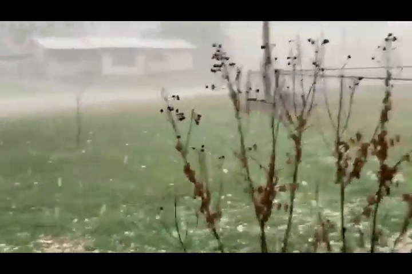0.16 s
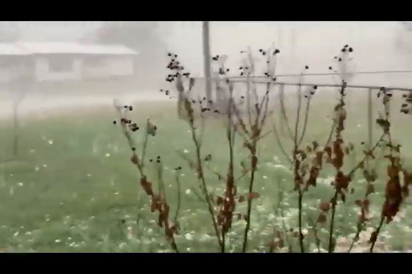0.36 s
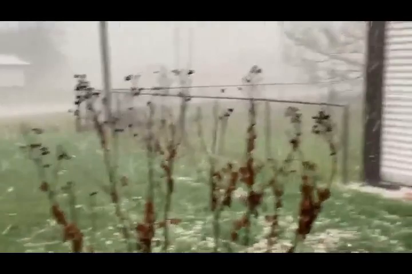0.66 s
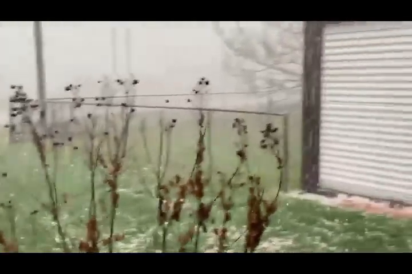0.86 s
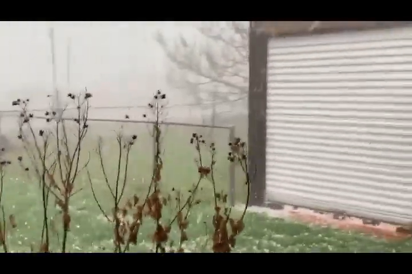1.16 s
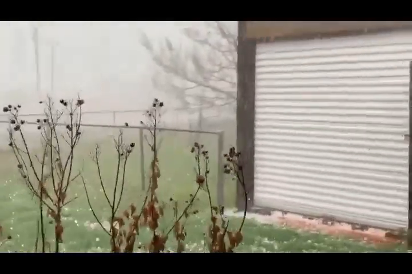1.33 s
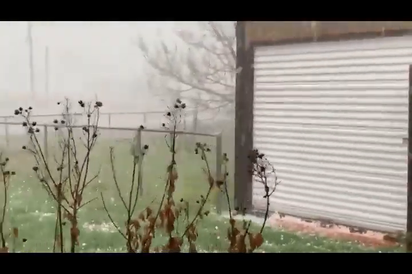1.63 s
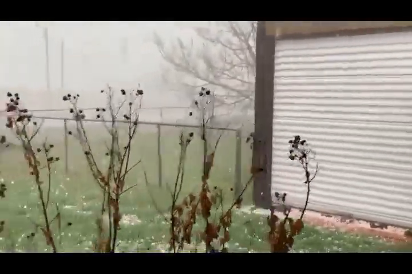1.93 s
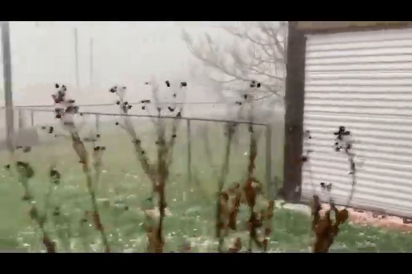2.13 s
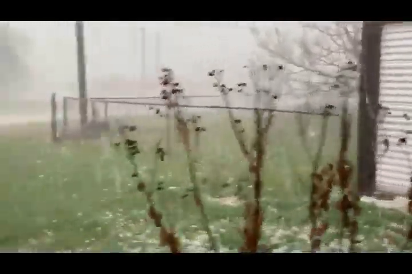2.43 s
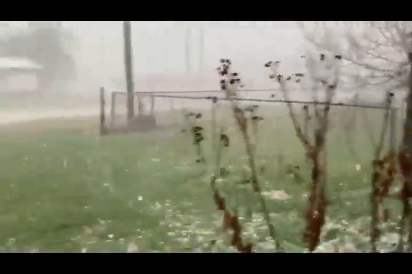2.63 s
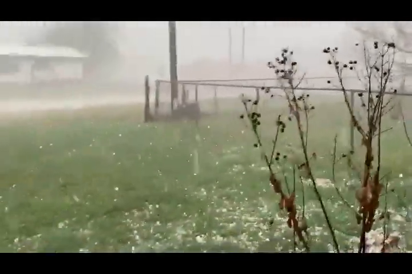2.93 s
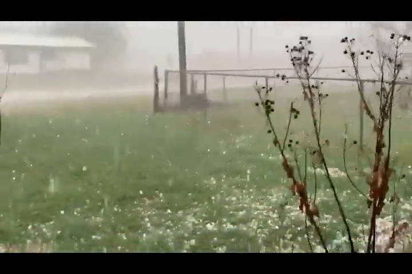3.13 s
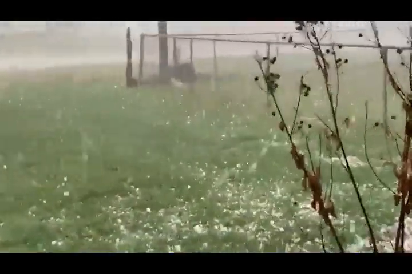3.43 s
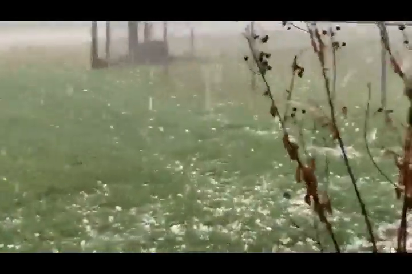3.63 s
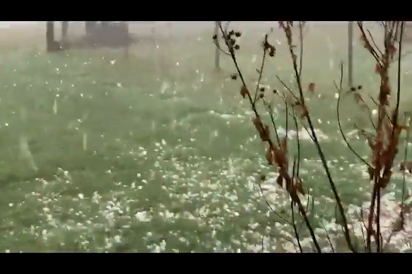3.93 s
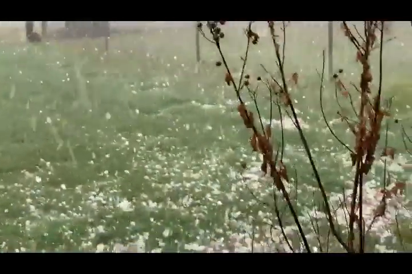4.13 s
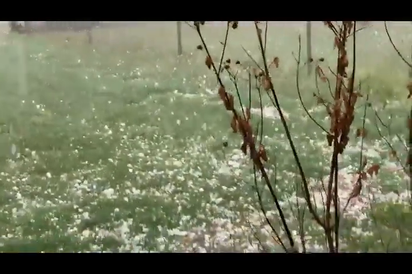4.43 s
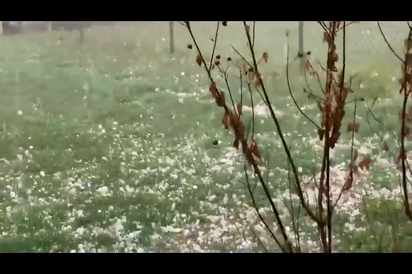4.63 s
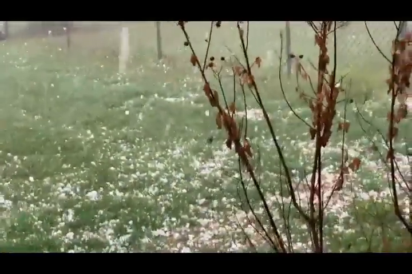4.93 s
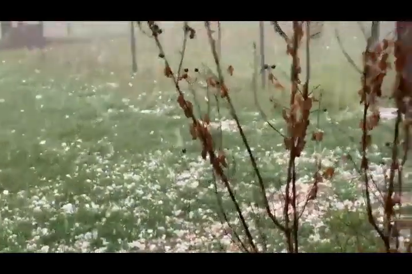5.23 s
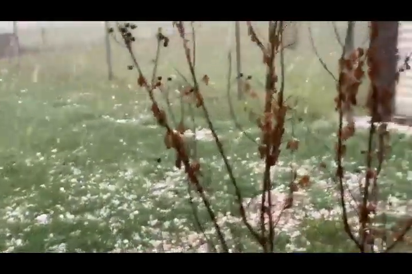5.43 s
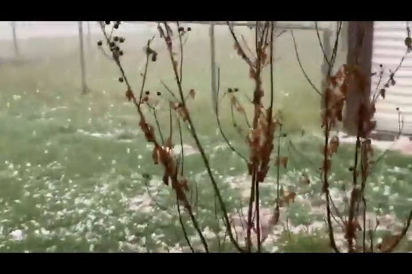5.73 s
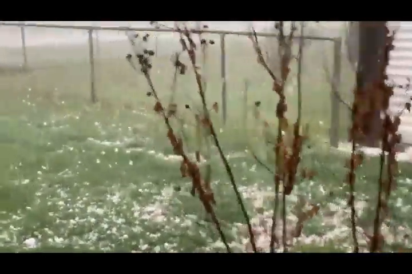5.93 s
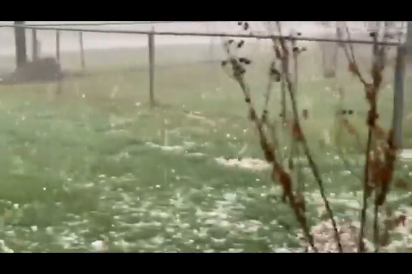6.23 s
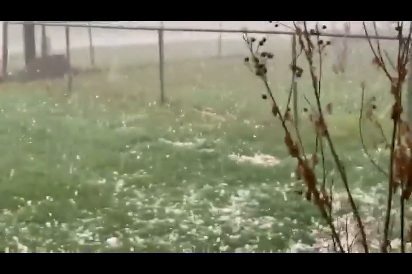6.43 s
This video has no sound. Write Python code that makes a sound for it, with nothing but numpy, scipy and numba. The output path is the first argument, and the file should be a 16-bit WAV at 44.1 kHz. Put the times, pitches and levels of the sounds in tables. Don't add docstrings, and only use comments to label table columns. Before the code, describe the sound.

For about six and a half seconds, heavy hail and rain beat on a lawn, porch roof and thin metal shed door. The sound is already full at the start: a dense, wide hiss of countless tiny ringing knocks over a smooth rain wash, with a faintly hollow porch colour. Gusts make it flicker rapidly. A loud low knock lands near 0.8 s and a dry pipe tick near 1.35 s; light metal raps and wooden thuds are scattered throughout. From about 2.3 to 2.7 s the fall eases by a couple of decibels, then stays steady. A high tick comes at 2.8 s, strong knocks to the left around 3.1 and 3.3 s, and the loudest sharp tick near 3.7 s. Another low knock sits right of centre near 5.95 s. The storm continues to the abrupt end, heard through a handheld stereo phone with limited, slightly watery treble.

```python
import sys
import numpy as np
from scipy import signal
from scipy.fft import rfft, irfft, dct
from scipy.io import wavfile
from scipy.ndimage import uniform_filter1d
from numba import njit

SR = 44100
rng = np.random.default_rng(int(sys.argv[2]) if len(sys.argv) > 2 else 0)


def voltage_ratio(level):
    return 10 ** (np.asarray(level, float) / 20)


def wrap_up_sound(samples):
    columns = np.atleast_2d(samples).T
    tamed = np.clip(columns, -1, 1)
    steps = np.round(tamed * 32767).astype(np.int16)
    wavfile.write(sys.argv[1], SR, steps)


N = 289296


# left_lag_ms [ms], lag_spread_ms [ms], level_db [dB], extra_above_knee_db [dB]
PATCHES = [
    (0.2132, 0.0098, -1.5, 8.5),
    (.27, 0.098, -1.5, -2.5),
    (-.38, 0.11, -1.5, -3),
    (.03, .3, -2, -2.5),
]
KNOCKS_PER_S = 30000
KNEE_HZ = 6760


def hail(gust, cycles, scatter_db, flicker_db):
    count = int(KNOCKS_PER_S * N / SR)
    when, pitch, big, ring = rng.random((count, 4)).T
    start = when * (N - 1)
    moment = start.astype(int)
    hz = 40 + 12500 * pitch ** 1.4

    lag_ms, spread_ms, patch_db, extra_db = np.array(PATCHES).T
    patch = np.arange(count) % len(PATCHES)
    octaves_above_knee = np.log2(hz[:, None] / KNEE_HZ)
    shares = voltage_ratio(patch_db + extra_db * np.tanh(4 * octaves_above_knee))
    share = shares[np.arange(count), patch] / np.sqrt(np.sum(shares ** 2, axis=1))

    strength_db, pan_db = gust_db(gust[:, moment], hz)
    flurries = np.array([walk(14) for _ in range(7)])
    flurry = flurries[np.minimum(pitch * 7, 6).astype(int), moment]
    stone_db = -scatter_db * np.log(1 - .99 * big)
    size = share * hz ** 0.68 * voltage_ratio(strength_db + flicker_db * pitch * flurry + stone_db)
    lag = (lag_ms[patch] + spread_ms[patch] * rng.standard_normal(count)) * SR / 1000
    left, right = size * voltage_ratio(pan_db / 2), size * voltage_ratio(-pan_db / 2)
    return knocks(start, hz, cycles * (.5 + ring), left, right, np.clip(lag, -60, 60), N)


@njit
def knocks(start, hz, cycles, left, right, lag, count):
    out = np.zeros((2, count + 4096))
    for k in range(len(start)):
        s = (2j * np.pi - 3 / cycles[k]) * hz[k] / SR
        turn = np.exp(s)
        length = min(int(2 * cycles[k] * SR / hz[k]) + 1, 3900)
        for port in range(2):
            t = start[k] + (lag[k] if port == 0 else -lag[k]) / 2 + 64
            i = int(t) + 1
            z = np.exp(s * (i - t)) * (left[k] if port == 0 else right[k])
            for j in range(length):
                out[port, i + j] += z.imag * min(1., (i + j - t) * hz[k] / SR)
                z *= turn
    return out[:, 64:count + 64]


# time_s [s], level_db [dB]
FALL = [(0, -27), (1.05, -26.5), (2.35, -28), (2.65, -29), (3.9, -28.5), (5.2, -29.5), (5.9, -28.5),
        (6.3, -29.5), (6.37, -28), (6.43, -29), (6.56, -29)]
# time_s [s], swell_db [dB], extra_for_high_stones_db [dB]
FLURRIES = [(0.069, 1.7, -1.5), (0.211, -1, 0.5), (0.378, -0.5, -1.2), (0.464, -0.7, -3), (0.559, 0.5, 2),
            (0.633, 0, 2.5), (0.685, -0.6, -0.5), (0.777, -2, 2.5), (0.848, -1, -0.5), (0.945, 0.6, 0.5),
            (1.156, 0, 3), (1.228, -0.5, -1.5), (1.349, 2.3, -4.5), (1.416, -2, -0.5), (1.725, -2, 0),
            (1.93, 1, -0.5), (2.162, 2, 1.5), (2.245, 1.5, 0), (2.418, 1.5, 1.5), (2.536, 0, 0),
            (2.667, 0, -7), (2.812, 2, 2.5), (2.941, -2.5, 3), (2.978, 1.5, -5), (3.019, -2.3, 1),
            (3.265, 2.5, -2.5), (3.33, -2, 1), (3.401, -0.5, -4), (3.452, 1, 2.5), (3.557, 1.8, 0.0),
            (3.676, 2, -0.5), (3.743, 1, -6.5), (3.881, -0.5, 0.5), (3.949, 0.6, 4), (4.14, -0.5, 2),
            (4.242, -1, 4), (4.312, 0, -3), (4.452, 2.1, -5.5), (4.486, 2, -3), (4.631, -2.4, 2.5),
            (4.797, 2, 0), (4.936, -1, -1), (4.992, 0.1, 1.5), (5.296, -2.5, 1), (5.408, 1.2, 4.5),
            (5.515, 1.9, -7), (5.58, 1.1, -2.7), (5.627, -0.5, -3.5), (5.682, 0.5, 4), (5.748, -1.5, -2),
            (5.789, 0.7, 4.5), (5.84, -2.5, 1.5), (5.901, 1, 3), (6.021, 0.5, 6), (6.132, 1, 0.5),
            (6.357, -5.5, 7), (6.472, 0, -2), (6.549, 3, 2)]
FLURRY_S = 0.018


def gusts():
    t = np.arange(N) / SR
    fall_s, fall_db = np.transpose(FALL)
    slow = np.interp(t, fall_s, fall_db) - np.interp(t, fall_s, fall_db).mean()
    swell, bright = np.zeros((2, N))
    for time_s, swell_db, extra_db in FLURRIES:
        bump = np.exp(-.5 * ((t - time_s) / FLURRY_S) ** 2)
        swell += swell_db * bump
        bright += extra_db * bump
    treble = 1.4 * slow + swell + 0.65 * bright + 0.5 * walk(24)
    bass = slow + 0.44 * swell + 0.5 * walk(12)
    lean = 0.03 * walk(4)
    return np.array([slow + swell, treble, bass, lean])


def gust_db(gust, hz):
    middle, treble, bass, lean = gust
    high = np.clip(np.log2(hz / 4000) + .5, 0, 1)
    low = np.clip(np.log2(400 / hz) + .5, 0, 1)
    return (1 - low - high) * middle + high * treble + low * bass, lean


def walk(rate):
    k = int(SR / rate)
    held = np.repeat(rng.standard_normal(N // k + 1), k)
    return 2.05 * uniform_filter1d(uniform_filter1d(held, k), k)[:N]


def level(x, db):
    return x * voltage_ratio(db) / np.sqrt(np.mean(x ** 2))


def shatter(events, cycles, burst_s, gain_db):
    start_s, peak_db, pitch_hz, pan_db = np.repeat(np.array(events), 9, axis=0).T
    late, detune = rng.random((len(start_s), 2)).T
    size = voltage_ratio(peak_db + gain_db - 2.9 * late)
    start = (start_s + burst_s * late ** 1.4) * SR
    hz = pitch_hz * 2 ** (0.7 * detune - .35)
    flat = np.ones(len(start))
    left, right = size * voltage_ratio(pan_db / 2), size * voltage_ratio(-pan_db / 2)
    return knocks(start, hz, cycles * flat, left, right, 9.5 * flat, N)


# start_s [s], level_db [dB], pitch_hz [Hz], left_minus_right_db [dB]
STONES = [
    (0.841, -15, 1120, -1),
    (1.298, -25, 2570, 2),
    (3.066, -15.5, 1650, 9),
    (3.277, -14, 1205, 10.5),
    (3.761, -17, 1960, -2),
    (3.809, -45, 2020, -27),
    (5.219, -27, 2500, 9),
    (5.576, -49, 2090, -9),
    (5.757, -21, 1080, 4),
    (5.949, -15, 1060, -5),
]


def near_stones():
    return shatter(STONES, 4.7, 0.011, -2.5)


# start_s [s], level_db [dB], pitch_hz [Hz], left_minus_right_db [dB]
SPLASHES = [(1.4775, -40, 4290, -10), (3.1158, -20, 4480, -4), (3.248, -15, 4920, -4),
            (3.673, -10, 9400, 2), (3.9175, -31, 4460, -16), (4.8688, -35, 4170, 6), (4.988, -26, 4010, -2),
            (5.1267, -18.5, 4100, 4), (5.3847, -17, 5100, -4), (6.1235, -17.5, 4210, -5),
            (6.3784, -22, 4070, 3)]


def splashes():
    return shatter(SPLASHES, 14.0, 0.0073, -6.5)


# start_s [s], level_db [dB], pitch_hz [Hz], left_minus_right_db [dB]
THUDS = [(0.209, -21, 690, 9), (1.297, -19, 660, -1.5), (1.515, -19, 993, -4), (1.741, -26, 662, 9),
         (2.055, -25, 872, 10), (3.242, -27, 700, 7), (4.441, -22, 686, 2), (4.793, -23, 872, -1),
         (5.127, -33, 710, 1), (5.466, -20, 810, 1), (5.841, -27, 740, -4)]


def porch_thuds():
    return shatter(THUDS, 4.5, 0.011, -3.5)


# start_s [s], level_db [dB], pitch_hz [Hz], left_minus_right_db [dB]
TICKS = [
    (0.8579, -20, 2200, -0.5),
    (1.3494, -11, 2050, -1.0),
    (2.0104, -24, 2960, 0.0),
    (2.3391, -25, 2300, -0.5),
    (2.5564, -34, 2650, 0.5),
    (2.8094, -13, 3140, -0.5),
    (3.6825, -6.5, 2100, 0.0),
    (3.8324, -15, 3800, -0.5),
    (5.4094, -25, 2510, -0.5),
    (5.4994, -28, 3030, -0.5),
]


def pipe_ticks():
    return shatter(TICKS, 2.4, 0.013, -10)


# start_s [s], level_db [dB], pitch_hz [Hz], left_minus_right_db [dB]
PELLETS = [(0.3094, -18, 2550, 0.5), (0.6094, -16, 2070, 0.0), (1.0624, -17, 2160, -1.0),
           (1.1444, -18, 2110, -1.0), (1.4904, -13, 1500, 0.0), (1.5164, -21, 2000, -1.0),
           (1.7424, -19, 1940, -1.5), (2.0574, -16, 2730, -1.0), (2.1464, -13, 2990, -1.5),
           (2.2243, -16, 2360, -1.5), (2.4074, -18, 2610, -0.5), (2.7048, -21, 2710, -0.5),
           (3.0964, -21, 2250, -1.0), (3.25, -17, 2070, 0.5), (3.2844, -20, 2200, 0.0),
           (3.9174, -23, 2370, -2.0), (5.3854, -19, 2490, -0.5)]


def door_pellets():
    return shatter(PELLETS, 3.0, 0.008, -12.5)


def far_rain(gust):
    mid, side = rfft(rng.standard_normal((2, N)))
    like = 1 / (1 + (np.fft.rfftfreq(N, 1 / SR) / 150) ** 2)
    mid = irfft(mid * np.sqrt(1 + like), N)
    side = irfft(side * np.sqrt(1 - like), N)
    return np.array([mid + side, mid - side]) * voltage_ratio(gust[0])


# pitch_hz [Hz], level_db [dB], left_minus_right_db [dB]
COLOUR = [(29.3, -17.5, 1), (61.3, -4, 0.5), (164, -4, -3.5), (258, -1.17, -3), (510, -2, 0),
          (1080, 0.02, -0.5), (1800, 0.1, -0.5), (2050, 0.5, -1), (2990, -3.5, 0.1), (4380, -5.5, -1),
          (5480, -11, -3), (7940, -11, 1), (7910, -10, 0.5), (12900, -19, -1)]
# pitch_hz [Hz], width_hz [Hz], boost_db [dB]
PORCH = [
    (260, 33, 2.5),
    (416, 54, 2.5),
    (666, 54, 3),
    (860, 100, 1),
    (2100, 540, 0.5),
]
# pitch_hz [Hz], sum_of_ports_db [dB], difference_of_ports_db [dB]
SUM_DIFFERENCE_TINT = [(288, 0, 0), (579, 0, 2.5), (1103, 0, -1.5), (1736, -1, 1), (2300, -1, -0.5), (2990, -0.5, 2),
                       (4350, -0.5, 1), (5220, -0.5, 0.5), (5770, -1, 3.5), (6520, 1, -2.5), (7600, -2.5, 0.5),
                       (8380, 1, -1), (9400, 0.5, 2), (10600, 0.5, 1.5)]


def colour(x):
    hz = np.fft.rfftfreq(N, 1 / SR) + 1
    f = np.log(hz)
    point_hz, db, lean_db = np.transpose(COLOUR)
    gain_db = [np.interp(f, np.log(point_hz), db + side * lean_db / 2, left=-40) for side in (1, -1)]
    porch_db = sum(boost_db / (1 + (2 * (hz - note_hz) / width_hz) ** 2) for note_hz, width_hz, boost_db in PORCH)
    left, right = rfft(x) * voltage_ratio(np.array(gain_db) + porch_db)
    point_hz, mid_db, side_db = np.transpose(SUM_DIFFERENCE_TINT)
    mid = (left + right) / 2 * voltage_ratio(np.interp(f, np.log(point_hz), mid_db))
    side = (left - right) / 2 * voltage_ratio(np.interp(f, np.log(point_hz), side_db) - 0.64)
    return irfft(np.array([mid + side, mid - side]), N)


def scene():
    gust = gusts()
    fall = colour(level(hail(gust, 4.67, 1.4, 1.6), 0) + level(far_rain(gust), -3.0))
    stones = near_stones() + splashes() + porch_thuds() + pipe_ticks() + door_pellets()
    return level(fall, -24) + stones


# pitch_hz [Hz], band_level_over_step [ratio]
FINENESS = [(200, 18), (800, 7.5), (1500, 3.2), (3000, 2.4), (5200, 1.8), (7600, 1.7), (9000, 1.7),
            (10300, 1.4), (11500, 1.2)]
# start_s [s], end_s [s]
EMPTY = [(0.18, 0.2), (0.27, 0.31), (0.36, 0.45), (0.55, 0.59), (0.69, 0.71), (0.73, 0.8), (0.92, 1.05),
         (1.1, 1.12), (1.24, 1.26), (1.31, 1.4), (1.43, 1.52), (1.57, 1.7), (1.78, 1.8), (2.13, 2.15),
         (2.43, 2.47), (2.64, 2.7), (2.82, 2.84), (2.94, 3.0), (3.19, 3.24), (3.36, 3.47), (3.54, 3.56),
         (3.61, 3.68), (3.7, 3.84), (3.87, 3.89), (4.01, 4.33), (4.4, 4.44), (4.8, 4.89), (5.05, 5.07),
         (5.12, 5.19), (5.21, 5.26), (5.42, 5.47), (5.49, 5.51), (5.56, 5.7), (5.72, 5.93), (6.0, 6.14),
         (6.24, 6.28), (6.42, 6.44)]
# start_s [s], end_s [s]
WIDE = [(4.04, 4.17), (5.79, 5.89)]
# start_s [s], end_s [s]
ALIKE = [(0.27, 0.33), (0.36, 0.4), (0.55, 0.64), (0.78, 0.82), (0.94, 0.98), (1.01, 1.1), (1.17, 1.19),
         (1.24, 1.26), (1.45, 1.47), (1.66, 1.68), (2.43, 2.47), (2.54, 2.56), (2.64, 2.68), (2.73, 2.82),
         (2.92, 2.96), (3.03, 3.1), (3.15, 3.19), (3.36, 3.38), (3.43, 3.45), (4.01, 4.07), (4.12, 4.17),
         (4.19, 4.21), (4.24, 4.26), (4.35, 4.37), (4.61, 4.63), (4.82, 4.84), (4.91, 4.93), (5.0, 5.05),
         (5.07, 5.09), (5.12, 5.14), (5.28, 5.3), (5.4, 5.47), (5.49, 5.54), (5.66, 5.68), (5.77, 5.79),
         (5.89, 5.91), (5.93, 6.07), (6.1, 6.16), (6.24, 6.28), (6.35, 6.42), (6.44, 6.46)]
# start_s [s], end_s [s]
TOP_ON = [(0.01, 0.03), (0.06, 0.1), (0.18, 0.2), (0.41, 0.5), (0.66, 0.71), (0.8, 0.87), (0.94, 0.96),
          (1.17, 1.22), (1.55, 1.59), (1.68, 1.7), (1.8, 1.89), (1.99, 2.01), (2.03, 2.08), (2.1, 2.12),
          (2.22, 2.24), (2.26, 2.28), (2.33, 2.35), (2.43, 2.47), (2.8, 2.84), (2.89, 2.96), (3.22, 3.28),
          (3.45, 3.49), (3.54, 3.59), (3.68, 3.7), (3.75, 3.82), (3.87, 4.0), (4.12, 4.17), (4.26, 4.31),
          (4.47, 4.54), (4.7, 4.77), (4.82, 4.84), (4.89, 4.91), (4.96, 4.98), (5.33, 5.35), (5.54, 5.56),
          (5.72, 5.74), (5.96, 6.0), (6.17, 6.21), (6.47, 6.49)]
# start_s [s], end_s [s]
SHORT = [(-0.01, 0.17), (0.45, 0.54), (0.71, 0.73), (0.83, 0.91), (1.2, 1.24), (1.57, 1.63), (1.75, 1.77),
         (1.82, 1.94), (2.01, 2.12), (2.15, 2.42), (2.47, 2.52), (2.85, 2.91), (3.24, 3.35), (3.5, 3.54),
         (3.57, 3.61), (3.89, 4.0), (4.49, 4.54), (4.56, 4.63), (4.73, 4.79), (4.94, 5.0), (5.35, 5.44),
         (5.61, 5.63), (6.19, 6.21), (6.31, 6.35), (6.51, 6.56)]
TOP_BAND_HZ = 10700
NOTCH_LOW_HZ, NOTCH_HIGH_HZ, WIDE_HZ = 6890, 7650, 8200
ALIKE_LOW_HZ, ALIKE_HIGH_HZ = 8600, 10340


def thin_out(x, limit_db, slope_db, jitter_db, step_jitter_db):
    hop, grid = 1024, 995
    frames = N // hop + 3
    pad = (2 * hop - grid, (frames - 1) * hop + grid - N)
    pair = np.pad(np.array([x[0] + x[1], x[0] - x[1]]) / 2, ((0, 0), pad), mode="reflect")

    n, line = np.arange(2 * hop), np.arange(hop) + .5
    window = signal.windows.kaiser_bessel_derived(2 * hop, 4 * np.pi)
    basis = np.cos(np.pi / hop * np.outer(line, n + .5 + hop / 2)) * window * np.sqrt(2 / hop)
    blocks = pair.reshape(2, -1, hop).transpose(0, 2, 1)
    spec = basis @ np.concatenate([blocks[..., :-1], blocks[..., 1:]], axis=1)
    hz = line * SR / (2 * hop)

    edges = np.r_[0:40:4, 40:96:8, 96:144:12, 144, 160, 176, 196, 216, 240, 264, 292, 320:hop:32]
    band = np.searchsorted(edges, np.arange(hop), side="right") - 1
    width = np.bincount(band)[:, None]
    power = spec ** 2 + 1e-20
    sums = np.add.reduceat(power, edges, axis=1)
    band_power = uniform_filter1d(sums.mean(axis=0) / width, size=3, axis=1) + 1e-20
    own_power = uniform_filter1d(sums / width, size=9, axis=2) + 1e-20

    chance = rng.standard_normal((2, *band_power.shape)) + .35 * rng.standard_normal((2, 1, frames))
    waver = uniform_filter1d(chance, size=2, axis=2)[:, band]
    nearby = uniform_filter1d(uniform_filter1d(power, size=3, axis=1), size=4, axis=2) + 1e-20
    under_db = 10 * np.log10(nearby / np.sqrt(band_power * own_power)[:, band]) + jitter_db * waver
    kept = under_db > slope_db * np.log2(hz / 7000)[:, None] - limit_db

    edge = uniform_filter1d(rng.standard_normal(frames), size=2) * np.sqrt(2)
    centre_s = ((np.arange(frames) - 1) * hop + grid) / SR

    def during(spans):
        return np.any([(centre_s > start_s) & (centre_s < end_s) for start_s, end_s in spans], axis=0)

    rows_hz = hz[:, None]
    kept[0] = np.where(rows_hz > TOP_BAND_HZ + 200 * edge, during(TOP_ON), kept[0])
    notch = (rows_hz > NOTCH_LOW_HZ - 100 * edge) & (rows_hz < NOTCH_HIGH_HZ - 150 * edge)
    kept[0] &= ~(notch & during(EMPTY))
    kept[0, (hz > NOTCH_LOW_HZ) & (hz < WIDE_HZ)] &= ~during(WIDE)
    kept[1, (hz > ALIKE_LOW_HZ) & (hz < ALIKE_HIGH_HZ)] &= ~during(ALIKE)

    short = during(SHORT)
    swap = dct(np.eye(8), type=4, norm="ortho")

    def trade(v):
        return np.where(short, (swap @ v.reshape(2, -1, 8, frames)).reshape(v.shape), v)

    spec = trade(spec)
    fine = np.interp(hz, *np.transpose(FINENESS))[:, None]
    step = np.sqrt(band_power[band]) / fine * voltage_ratio(-step_jitter_db * waver)
    step[0] *= np.where(hz > TOP_BAND_HZ, .6, 1)[:, None]
    whole = np.floor((np.abs(spec) / step) ** .75 + .4054)
    rounded = np.sign(spec) * step * whole ** (4 / 3)

    blocks = basis.T @ (trade(rounded) * kept)
    pair = (blocks[:, :hop, 1:] + blocks[:, hop:, :-1]).transpose(0, 2, 1).reshape(2, -1)
    mid, side = pair[:, hop - grid:hop - grid + N]
    return np.array([mid + side, mid - side])


def low_pass(x):
    return signal.sosfilt(signal.butter(12, 11710, fs=SR, output="sos"), x)


def record(dry):
    thinned = thin_out(dry, limit_db=2.4, slope_db=.6, jitter_db=1.8, step_jitter_db=2.5)
    return low_pass(thinned)


dry = scene()
out = record(dry)
wrap_up_sound(out)
```